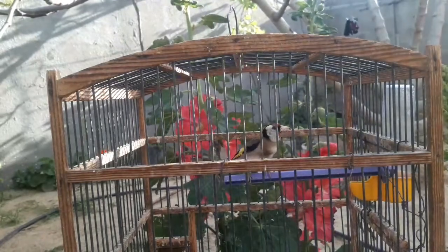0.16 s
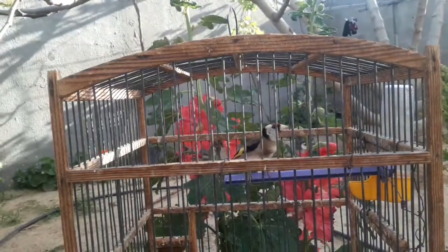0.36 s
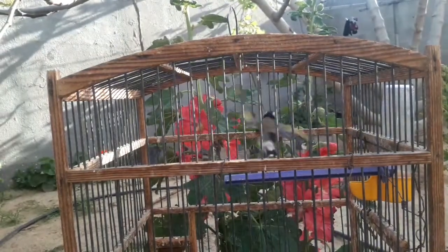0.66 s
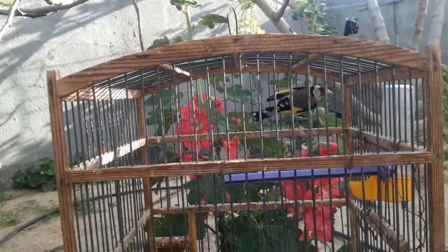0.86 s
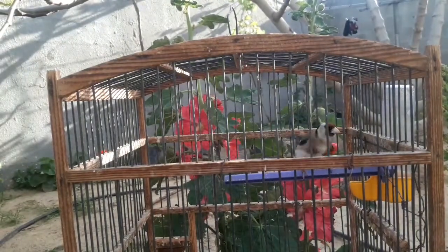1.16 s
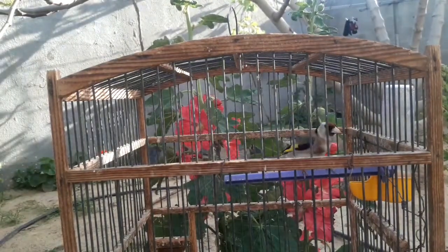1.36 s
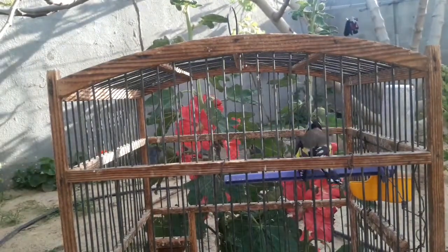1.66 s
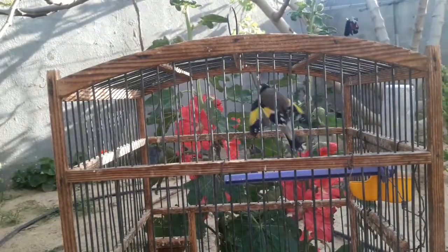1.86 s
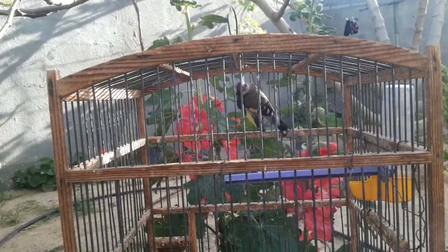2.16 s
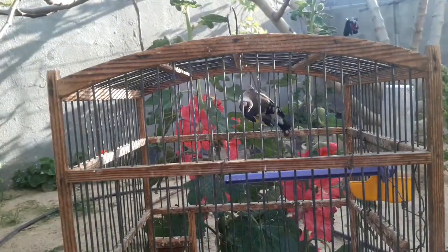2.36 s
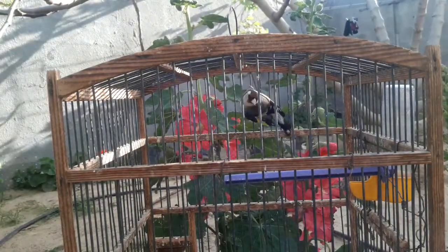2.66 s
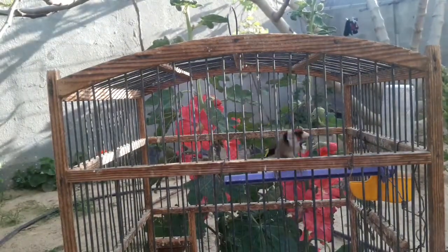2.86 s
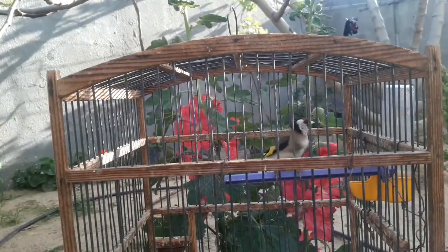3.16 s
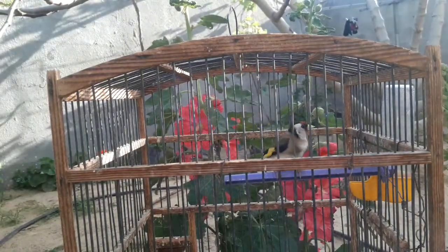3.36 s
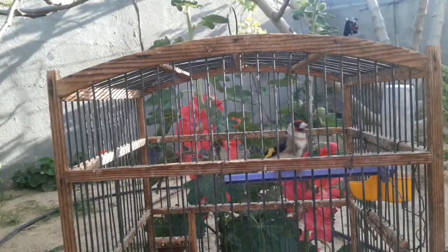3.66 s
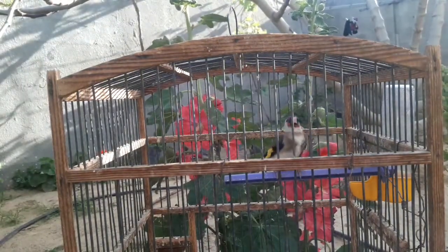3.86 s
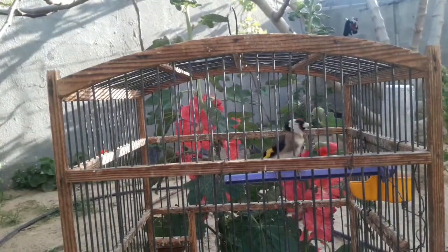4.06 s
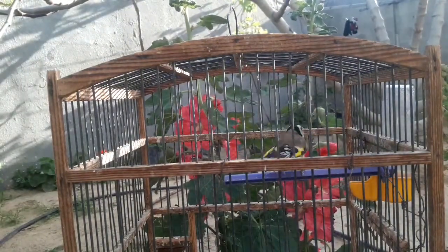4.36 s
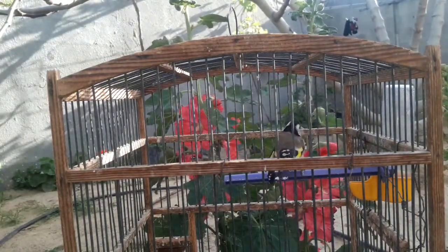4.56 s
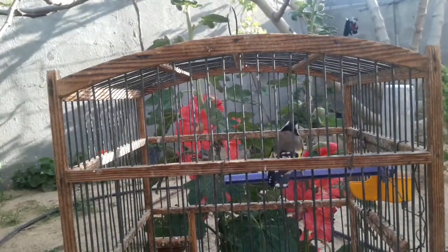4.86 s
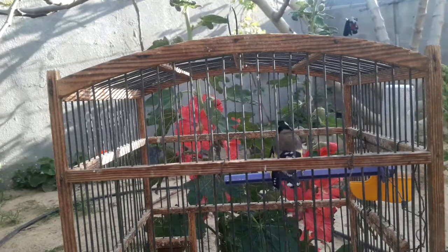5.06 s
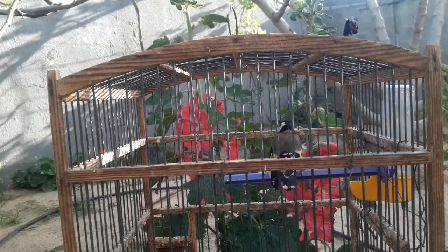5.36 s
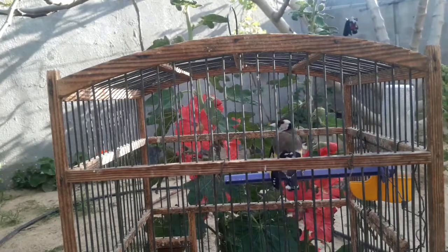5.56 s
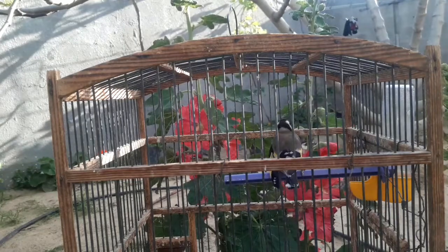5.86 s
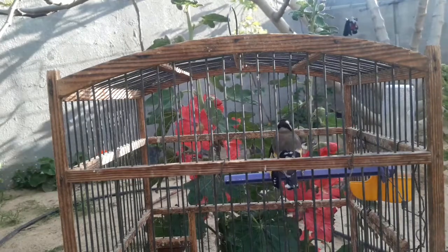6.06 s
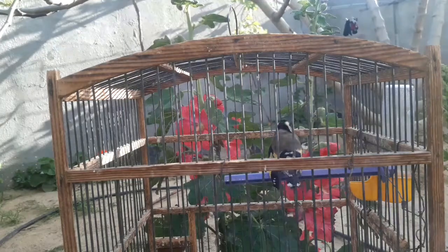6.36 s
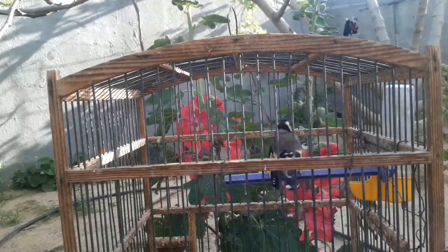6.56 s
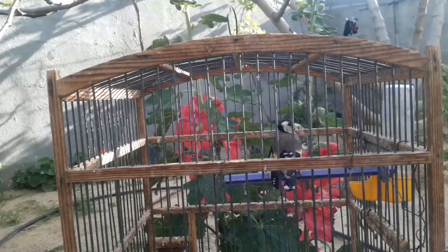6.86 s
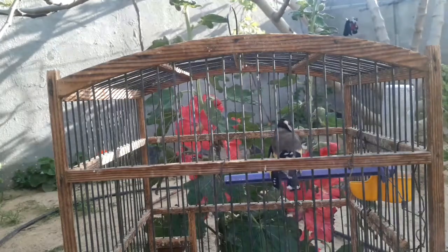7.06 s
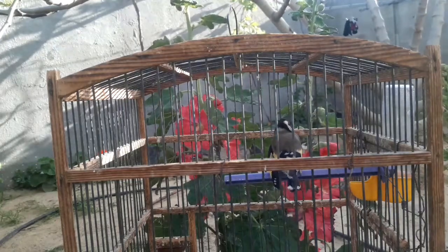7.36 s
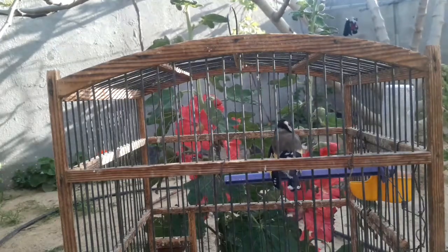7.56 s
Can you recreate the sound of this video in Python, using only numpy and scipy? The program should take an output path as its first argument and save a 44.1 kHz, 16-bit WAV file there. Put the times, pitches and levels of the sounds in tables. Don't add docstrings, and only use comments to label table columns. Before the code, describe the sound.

A goldfinch close by twitters bursts of quick, pure high notes between pauses filled with distant birdsong, sparrow chirps and soft cage knocks outdoors.

```python
import sys
import numpy as np
from scipy import signal
from scipy.fft import rfft, irfft
from scipy.io import wavfile
from scipy.ndimage import uniform_filter1d

SR = 44100
rng = np.random.default_rng(int(sys.argv[2]) if len(sys.argv) > 2 else 0)


def output_pcm(signal):
    pcm = np.clip(np.atleast_2d(signal).T, -1, 1) * 32767
    wavfile.write(sys.argv[1], SR, np.round(pcm).astype(np.int16))


def invert_db(level):
    return 10 ** (np.asarray(level, dtype=float) / 20)


N = 340011

# frequency in Hz, level in dB per Hz.
TOWN_COLOUR = [(59, -38), (110, -4), (400, -11), (1840, -20.5), (4050, -20), (6480, -24.5), (8420, -51),
               (14300, -120)]
# peak in seconds, half length in seconds, level in dB.
SHAKES = [(0, 0.014, -65.5), (.48, 0.036, -66.5), (1.62, 0.28, -61), (2.11, 0.069, -58.5),
          (2.51, 0.9, -80.5), (4.04, 0.033, -56), (4.16, 0.24, -57.5), (4.31, 0.051, -59.5)]
TOWN_LEVEL_DB = -61.5
SWELL_DB = -15.5

# peak in seconds, half length in seconds, level in dB.
GUSTS = [(0, 0.015, -57.5), (.15, 0.064, -66), (.48, 0.11, -59.5), (.76, 0.19, -72), (1.03, 0.18, -64.5),
         (1.27, 0.13, -69), (1.68, 0.11, -68), (1.95, 0.035, -78.5), (2.17, 0.23, -65.5),
         (2.44, 0.055, -66), (2.595, .04, -59.5), (2.84, 0.14, -63.5), (3.0, 0.088, -68), (3.44, 0.19, -67),
         (3.61, 0.036, -70.5), (4.26, 0.06, -65), (4.322, 0.035, -53), (4.47, 0.06, -66), (4.04, .05, -68),
         (4.8, 0.08, -73.5), (5.09, 0.048, -66), (5.48, 0.13, -68.5), (5.97, 0.16, -69.5), (6.18, .12, -66),
         (6.45, 0.37, -81.5), (7.12, 0.14, -82), (7, .03, -68), (7.302, .012, -66)]
# frequency in Hz, level in dB.
LEAF_COLOUR = [(300, -9), (1000, 2), (3000, 3.5), (6200, 3), (7500, -18), (10000, -12), (14800, -6.5),
               (15700, -8)]
# peak in seconds, # half length in
# seconds, level in dB.
SNAPS = [(0, .002, -48), (.23, .003, -64), (.244, .003, -65), (.462, .005, -62), (1.204, .003, -61),
         (1.314, .003, -58), (1.527, .003, -58), (1.679, .003, -60), (1.985, .003, -62), (2.21, .003, -61),
         (2.457, .004, -60), (2.585, .006, -58), (2.927, .004, -59), (3.722, .003, -55), (4.304, .004, -52),
         (4.441, .004, -60), (4.552, .004, -59), (4.826, .004, -63), (3.735, .025, -61), (7.152, .01, -65),
         (7.185, .01, -65), (7.614, .016, -56), (7.64, .016, -61)]
# frequency in Hz, level in dB.
TWIG_COLOUR = [(2500, -22), (4500, -3), (6200, 3), (7500, -15), (10000, -10), (14800, -6), (15700, -8)]

# peak in seconds, half length in seconds, level in dB.
WIND_PUFFS = [(.07, 0.11, -52), (2.1, 0.063, -55), (4.02, 0.16, -54.5), (4.3, 0.18, -58.5),
              (4.74, 0.1, -49), (6.76, 0.27, -52.5), (7.54, .1, -55)]
# frequency in Hz, level in dB per Hz.
WIND_COLOUR = [(20, -32), (33, -10.5), (53, 4), (76, 8.5), (147, 0.5), (377, -17.5), (500, -11.5),
               (700, -38.5)]
CALM_DB = -60
# start in seconds, peak in dB.
THUDS = [(0.048, -34.5), (0.288, -41.5), (0.581, -41), (1.671, -42.5), (1.945, -40), (2.12, -37),
         (5.081, -41), (6.503, -41.5), (6.738, -40), (7.083, -40), (7.532, -36.5)]
THUD_HZ, THUD_S = 105, .032

# start in seconds, level in dB,
# delay of the middle notes in seconds, delay of the last notes in seconds.
RISING_AT = [(4.155, 0.6, 0.0022, 0.00059), (4.432, 0.8, 0.00086, 0.00024), (4.709, 0.7, 0.00085, 0),
             (4.9848, 0.6, 0.0023, 0)]
SHORTER_AT = [(-.1312, 0.12, 0.044, 0.0011), (0.069, -0.071, 0, -0.00031),
              (5.2134, -0.037, 0.0031, -0.0082), (5.3984, 0.12, 0, -0.00057), (5.5974, 0.1, 0, 0.00022),
              (5.797, 0.027, 0, -0.00045), (5.996, 0.021, 0, 0.00075), (6.195, 0.061, 0.00064, 0.00078),
              (6.396, 0.047, 0, -0.00041)]
MIDDLE_S, LAST_S = .02, .1
# time from the phrase start in seconds, pitch in Hz, level in dB.
RISING_NOTES = [
    [(-.006, 3400, -55), (-.0015, 3500, -22), (.006, 3800, -13.5), (.0085, 3850, -20), (.015, 3800, -21),
     (.024, 3780, -40)],
    [(.0285, 4580, -50), (.036, 4685, -10.5), (.04, 4710, -10), (.0505, 4665, -4), (.0553, 4690, -7.5),
     (.059, 4760, -30), (.0617, 4720, -16), (.0655, 4660, -22), (.082, 4645, -36)],
    [(.092, 5805, -60), (.098, 5875, -30.5), (.108, 5840, -19), (.1115, 5720, -24), (.1154, 5775, -16.5),
     (.1239, 5695, -47)],
    [(.1435, 3500, -46), (.1462, 3900, -18), (.1478, 4050, -36), (.15, 4150, -15), (.158, 4170, -8.7),
     (.1674, 4245, -11), (.1724, 4365, -18), (.1769, 4450, -53)],
]
SHORTER_NOTES = [
    [(.036, 4500, -40), (.043, 4500, -24), (.0495, 4650, -19), (.0548, 4530, -5), (.0634, 4400, -2.5),
     (.0729, 4355, -3.5), (.0779, 4395, -3.8), (.0829, 4355, -18), (.0899, 4380, -32)],
    [(.1185, 5250, -50), (.121, 5230, -20), (.1242, 5310, -7.5), (.127, 5460, -13.5), (.135, 5320, -6.8),
     (.1429, 5330, -11.5), (.1464, 5285, -12), (.1524, 5285, -30), (.1559, 5300, -47)],
]
# peak from the phrase start in seconds,
# length in seconds, pitch in Hz, glide in Hz, level in dB.
RISING_PIPS = [
    (-.0295, 0.011, 2775, 367, -30.5),
    (-.009, 0.0049, 2755, 148.4, -34),
    (0.013, .013, 4190, 450, -24.5),
]
SHORTER_PIPS = [(.003, .0095, 2960, 300, -16.5), (.012, .026, 2960, 0, -31), (.0405, .006, 3900, 300, -31),
                (.0362, .009, 3530, 500, -24), (.0385, .01, 5080, 300, -24), (.046, .017, 5900, 200, -34),
                (.0325, .007, 4900, 600, -35), (.038, .007, 4450, 400, -19), (.044, .009, 5150, -200, -33),
                (.124, .011, 6160, 300, -25.5), (.133, .016, 6350, 20, -38), (.1424, .016, 6280, -200, -23)]
PIP_PEAK_SHARE, PIP_EDGE_DB = .38, -27
# note in Hz, level in dB.
OCTAVE = [(4200, -63), (4400, -65), (4560, -53), (4700, -46), (5300, -46)]
TWELFTH_DB = -58
# frequency in Hz, level in dB.
YARD_COLOUR = [(2900, 4), (3800, 2.5), (4200, 0.5), (4400, 1.5), (4700, 4.5), (5300, -3), (5800, 12.5),
               (6300, -3)]

# frequency in Hz, level in dB.
FAR_COLOUR = [(2300, -7), (3500, 3.5), (4500, 8), (5550, 1), (5850, -10), (7300, -7)]
FAR_T60_S, FAR_DIRECT_DB = 0.57, -10
# start in seconds, length in seconds, first Hz, last Hz, level in dB.
HELD = [(0, 0.051, 3400, 3240, -46.5), (2.258, .04, 4780, 4520, -43), (2.875, .22, 6200, 6120, -50.5),
        (1.852, .03, 5550, 5150, -39), (2.058, .03, 5600, 5200, -40), (1.378, .03, 7200, 6800, -53),
        (1.575, .05, 7250, 7150, -54), (2.015, .04, 7250, 7100, -53), (1.72, .05, 2520, 2430, -48),
        (1.94, .05, 2620, 2500, -46), (2.15, .06, 2520, 2430, -46), (2.615, .15, 3550, 3400, -56),
        (2.355, .07, 3250, 2700, -46.5), (2.666, 0.099, 5090, 4414, -47.5),
        (2.758, 0.17, 4820, 4100, -50.5), (2.655, 0.23, 4000, 3600, -54.5),
        (3.354, 0.31, 5600, 5360, -49.5), (3.58, 0.19, 5480, 5284, -45), (3.581, 0.15, 3460, 3310, -51.5),
        (3.81, .08, 5200, 5130, -43), (3.822, 0.045, 4500, 4000, -44.5), (3.93, .08, 5320, 5270, -43),
        (4.04, .08, 5250, 5130, -43), (4.155, .08, 5300, 5220, -44), (3.97, .17, 3430, 3380, -48.5),
        (4.19, .08, 3500, 3300, -47)]
# start in seconds, length in seconds, first Hz, last Hz, level in dB.
RISES = [(0.198, 0.054, 2800, 3320, -40.5), (2.256, 0.065, 4630, 5600, -44),
         (2.229, 0.026, 3220, 4060, -42), (2.298, 0.089, 5505, 7000, -51), (2.376, 0.063, 3200, 3890, -48),
         (2.44, 0.047, 4340, 5170, -41), (2.488, 0.08, 5080, 7220, -43), (2.61, 0.055, 3250, 5150, -45),
         (2.777, 0.022, 5100, 7400, -49), (2.957, 0.029, 2870, 4630, -40.5),
         (3.577, 0.012, 3840, 5000, -51), (3.738, 0.075, 2990, 3860, -46), (3.79, 0.04, 3800, 5200, -45),
         (4.02, .03, 4400, 5000, -43), (6.911, 0.03, 5290, 6030, -55), (7.389, 0.016, 4300, 5890, -49)]
# start in seconds, length in seconds, top in Hz, level in dB.
FALLS = [(0.379, 0.067, 3995, -46.5), (0.711, .066, 3710, -41), (1.341, 0.064, 4030, -42),
         (1.424, .12, 5230, -39.5), (1.621, .13, 5644, -39), (3.868, 0.07, 3674, -42.5),
         (4.746, 0.08, 3796, -43), (5.551, .06, 4170, -42), (5.902, .1, 4910, -42),
         (6.61, 0.074, 5116, -45.5), (6.651, 0.043, 3617, -44), (7.314, 0.09, 5020, -45),
         (7.295, .02, 6500, -52), (7.388, 0.077, 3267, -42)]
# start in seconds, top in Hz, level in dB.
RASPS = [
    (1.373, 7430, -51),
    (1.578, 7560, -53),
    (1.801, 7430, -37.5),
    (2.018, 7330, -38.5),
]
RASP_S, LOW_HZ = 0.17, 2426
FALL_BEND, RASP_BEND, RISE_BEND, CHIRP_BEND = .58, 0.64, 0.57, 0.46
# length in seconds, first Hz, last Hz, level in dB.
LOW_STROKE = (.045, 3750, 4500, -45)
HIGH_STROKE = (0.04, 5100, 6200, -39.5)
SEESAW_S, SEESAW_GAP_S, HIGH_LATE_S, SINK_HZ_PER_S = 3.07, .11, .05, 1300
# time in seconds, level in dB.
TRILL_LEVEL = [(0.5, -50), (0.68, -43), (1.188, -44.5), (1.401, -44.5)]
# delay in seconds, length in seconds,
# first Hz, middle Hz, last Hz, level in dB.
TRILL_STROKES = [
    (0, .03, 6100, 4520, 3950, 0),
    (.026, .028, 4950, 4280, 3880, -2),
]
TRILL_PER_S, TRILL_SINK_HZ_PER_S = 14.1, 290
# time in seconds, level in dB.
CHORUS_LEVEL = [(0, -88.5), (.4, -51), (1.3, -56.5), (2.6, -50.5), (4.1, -54), (5.1, -47), (6.3, -63),
                (6.85, -87.5), (7.71, -100)]
CHORUS_PER_S, CHORUS_LOW_HZ, CHORUS_HIGH_HZ, CHORUS_GLIDE_HZ = 30, 3200, 5300, 1400

# start in seconds, length in seconds, first Hz, last Hz, level in dB.
SPARROW = [(3.578, .012, 3950, 4800, -43), (.59, .08, 3430, 2700, -65), (1.356, 0.021, 3290, 2730, -45.5),
           (4.771, 0.024, 3900, 2735, -43), (4.813, 0.029, 3680, 2903, -43),
           (4.847, 0.032, 3614, 2855, -47.5), (7.325, .015, 5000, 4100, -54), (0.235, .33, 3216, 3393, -48),
           (0.19, 0.064, 2400, 3220, -50), (.362, 0.026, 4000, 4400, -52), (.395, .08, 3880, 2324, -47),
           (0.88, 0.02, 3800, 3110, -45.5), (0.923, 0.016, 3110, 3640, -46),
           (0.948, 0.018, 3385, 2560, -42), (1.205, 0.017, 2480, 2380, -46.5),
           (2.45, .016, 3340, 4330, -45), (2.467, .062, 4380, 2758, -41), (2.922, 0.023, 4540, 3150, -45),
           (2.93, 0.042, 2200, 3600, -51), (2.978, 0.033, 3650, 2320, -41.5),
           (3.605, 0.027, 3500, 2690, -47), (3.67, .03, 3000, 2360, -49), (5.03, .055, 2000, 2577, -58),
           (5.043, 0.045, 2628, 3970, -46), (5.06, .042, 2670, 4185, -41), (5.102, .058, 3880, 2584, -41.5),
           (5.14, .03, 3680, 2910, -49), (6.603, .014, 2420, 4900, -55.5), (6.643, .02, 2370, 3060, -56),
           (6.715, 0.0292, 3040, 2936, -42.5), (6.73, 0.027, 3010, 2290, -55),
           (6.922, 0.027, 5100, 5400, -54), (6.948, 0.021, 3105, 4660, -44.5),
           (6.975, 0.028, 3560, 2560, -46), (7.024, 0.018, 3050, 4140, -46.5),
           (7.048, 0.0177, 3320, 2360, -49), (7.41, 0.041, 4695, 6450, -52), (7.45, .035, 6500, 6700, -50),
           (7.505, .045, 6700, 5800, -52), (7.452, 0.07, 3657, 2600, -41.5)]
# start in seconds, peak in dB, ring in Hz.
KNOCKS = [(0.867, -36, 495), (0.979, -40, 453), (1.282, -37, 340), (1.527, -39, 366), (1.672, -38, 583),
          (2.102, -38, 486), (2.516, -36, 700), (2.709, -40, 610), (3.299, -42, 480), (4.009, -32.5, 367),
          (4.064, -37.5, 687), (4.372, -43, 1530), (5.822, -48, 1630), (6.647, -55, 500),
          (7.012, -44.5, 1250)]
# frequency in Hz, level in dB.
MOTOR_COLOUR = [(120, -11.5), (155, 1.5), (190, -18)]
# time in seconds, level in dB.
MOTOR_LEVEL = [(4.6, -73), (5.199, -59.5), (7.7, -66)]
# time in seconds, pitch in Hz, level in dB.
DOVE = [
    [(6.5, 560, -72), (6.58, 570, -61), (6.67, 575, -61), (6.7, 570, -75)],
    [(6.61, 495, -68), (6.65, 490, -56), (6.76, 488, -51), (6.8, 480, -62), (6.99, 480, -66)],
    [(7.09, 485, -66), (7.115, 482, -57), (7.16, 480, -70), (7.23, 475, -54), (7.33, 470, -55),
     (7.36, 455, -72)],
    [(6.4, 970, -68), (6.52, 1020, -69), (6.62, 1025, -63), (6.75, 1040, -67), (6.87, 1030, -70)],
    [(7.15, 1030, -72), (7.18, 1025, -62), (7.22, 1015, -66), (7.27, 1010, -72)],
]


def read(points, at):
    x, value = np.transpose(points)
    return np.interp(np.log(at + 1), np.log(x + 1), value)


def evened(x):
    return x / np.sqrt(np.mean(x ** 2) + 1e-20)


def add(mix, s, sound):
    at = round(s * SR)
    sound = sound[max(-at, 0):]
    part = mix[max(at, 0):][:len(sound)]
    part += sound[:len(part)]


def level(curve):
    s, db = np.transpose(curve)
    return invert_db(np.interp(np.arange(N) / SR, s, db))


def swells(rows):
    t = np.arange(N) / SR
    return sum(invert_db(db + SWELL_DB * np.minimum(abs(t - s) / half_s, 4) ** 1.1) for s, half_s, db in rows)


def noise(colour, size, patchy_db, flicker_db):
    frames, hz = 4 * N // size + 5, np.fft.rfftfreq(size, 1 / SR)
    real, imag, patches = rng.standard_normal((frames, len(hz), 3)).T
    patches = uniform_filter1d(patches, size=10, axis=0)
    patches = evened(uniform_filter1d(patches, size=8, axis=1))
    flicker = evened(uniform_filter1d(rng.standard_normal(frames), size=3))
    outside = (hz < colour[0][0]) | (hz > colour[-1][0])
    band_db = (read(colour, hz) - 60 * outside)[:, None]
    z = (real + 1j * imag) * invert_db(band_db + patchy_db * patches + flicker_db * flicker)
    return evened(signal.istft(z, nperseg=size, noverlap=3 * size // 4)[1][:N])


def echoes(x, t60_s, start_s, rise_s):
    t = np.arange(SR // 2) / SR
    taps = rng.standard_normal(len(t)) * (rng.random(len(t)) < .15)
    taps *= invert_db(-60 * t / t60_s) * np.clip((t - start_s) / rise_s, 0, 1)
    return signal.fftconvolve(x, taps / np.linalg.norm(taps))


def whistle(s, hz, db):
    t = np.arange(s[0], s[-1], 1 / SR)
    turns = np.cumsum(np.interp(t, s, hz)) / SR + rng.random()
    swing = np.interp(t, s, invert_db(.7 * np.asarray(db))) ** (1 / .7)
    swing = uniform_filter1d(swing, size=31)
    fade = np.clip(np.minimum(t - s[0], s[-1] - t) / .001, 0, 1) ** 2
    return swing * fade * np.sin(2 * np.pi * turns)


def glide(length_s, first_hz, middle_hz, last_hz, db, burr=0.):
    u = np.linspace(0, 1, max(round(length_s * SR), 50))
    hz = first_hz * (1 - u) * (1 - 2 * u) + 4 * middle_hz * u * (1 - u) + last_hz * u * (2 * u - 1)
    shake = evened(uniform_filter1d(rng.standard_normal(len(u) + 400), size=70))[:len(u)]
    hz = hz + burr * shake * np.clip(np.ptp(hz), 500, 3000)
    gain = invert_db(db + read(FAR_COLOUR, hz)) * signal.windows.tukey(len(u), .35)
    return np.sqrt(2) * gain * np.sin(2 * np.pi * (np.cumsum(hz) / SR + rng.random()))


def bent(length_s, first_hz, last_hz, db, bend, burr=0.):
    return glide(length_s, first_hz, first_hz + bend * (last_hz - first_hz), last_hz, db, burr)


def town():
    gain = swells(SHAKES) + invert_db(TOWN_LEVEL_DB)
    return gain * invert_db(4.5) * noise(TOWN_COLOUR, size=1024, patchy_db=2.0, flicker_db=1.5)


def leaves():
    gain = swells(GUSTS) + invert_db(-79.0)
    return gain * invert_db(12.0) * noise(LEAF_COLOUR, size=256, patchy_db=-1.5, flicker_db=2.2)


def twigs():
    return swells(SNAPS) * invert_db(11.0) * noise(TWIG_COLOUR, size=256, patchy_db=1.5, flicker_db=1.5)


def wind():
    gain = swells(WIND_PUFFS) + invert_db(CALM_DB)
    return gain * noise(WIND_COLOUR, size=1024, patchy_db=0.5, flicker_db=5.0)


def pip(s, length_s, hz, glide_hz, db):
    share = np.array([-PIP_PEAK_SHARE, 0, 1 - PIP_PEAK_SHARE])
    return np.transpose([s + share * length_s, hz + share * glide_hz, db + PIP_EDGE_DB * (share != 0)])


def finch_note(s, hz, db):
    sound = whistle(s, hz, db)
    sound = sound + whistle(s, 2 * hz, db + read(OCTAVE, hz))
    return sound + whistle(s, 3 * hz, db + TWELFTH_DB - 40 * (hz > 5000))


def yard(x):
    t = np.arange(SR) / SR
    taps = rng.standard_normal(SR) * (rng.random(SR) < .05) * np.clip((t - .006) / .008, 0, 1)
    taps *= invert_db(-40.0 - 60 * t / 0.17) + invert_db(-43.5 - 60 * t / 0.38)
    wall_gain = invert_db(read(YARD_COLOUR, np.arange(SR // 2 + 1)))
    taps = irfft(rfft(taps) * wall_gain, SR) * (t < .8)
    return signal.fftconvolve(x, taps)[SR:N + SR]


def finch():
    out = np.zeros(N + SR)
    phrases = ((RISING_NOTES, RISING_PIPS, RISING_AT), (SHORTER_NOTES, SHORTER_PIPS, SHORTER_AT))
    for notes, pips, rows in phrases:
        for note in notes + [pip(*row) for row in pips]:
            s, hz, db = np.transpose(note)
            sound = finch_note(s, hz, db)
            for start_s, gain_db, middle_late_s, last_late_s in rows:
                late_s = 0
                if s[0] > MIDDLE_S:
                    late_s = last_late_s if s[0] > LAST_S else middle_late_s
                add(out, 1 + start_s + s[0] + late_s, invert_db(gain_db) * sound)
    return out[SR:] + yard(out)


def seesaw():
    calls = []
    for beat in range(5):
        since_s = beat * SEESAW_GAP_S
        sink_hz = SINK_HZ_PER_S * since_s
        length_s, first_hz, last_hz, db = LOW_STROKE
        bend = .8 if beat == 4 else RISE_BEND
        sound = bent(length_s, first_hz - sink_hz, last_hz - sink_hz, db, bend, burr=0.1)
        calls.append((SEESAW_S + since_s, sound))
        if beat < 3:
            length_s, first_hz, last_hz, db = HIGH_STROKE
            sound = bent(length_s, first_hz - sink_hz, last_hz - sink_hz, db, .8, burr=0.1)
            calls.append((SEESAW_S + since_s + HIGH_LATE_S, sound))
    return calls


def far_calls():
    calls = [(s, bent(*note, 0.73, burr=0.17)) for s, *note in HELD]
    calls += [(s, bent(*note, RISE_BEND, burr=0.071)) for s, *note in RISES]
    calls += [(s, bent(length_s, hz, LOW_HZ, db, FALL_BEND, burr=0.069)) for s, length_s, hz, db in FALLS]
    calls += [(s, bent(RASP_S, hz, LOW_HZ, db, RASP_BEND, burr=0.041)) for s, hz, db in RASPS]
    return calls + seesaw()


def trill():
    s, db = np.transpose(TRILL_LEVEL)
    calls = []
    for at in np.arange(s[0] + .008, s[-1] - .03, 1 / TRILL_PER_S):
        beat_db = np.interp(at + .04, s, db)
        for late_s, length_s, *hz, step_db in TRILL_STROKES:
            sunk_hz = np.subtract(hz, TRILL_SINK_HZ_PER_S * (at - s[0]))
            calls.append((at + late_s, glide(length_s, *sunk_hz, beat_db + step_db, burr=.08)))
    return calls


def far_birds():
    out = np.zeros(N)
    for s, sound in far_calls() + trill():
        add(out, s, invert_db(FAR_DIRECT_DB) * sound)
        add(out, s, echoes(sound, FAR_T60_S, .001, .006))
    return out


def chorus():
    out = np.zeros(N)
    for at, pitch, slope, size in rng.random((round(CHORUS_PER_S * N / SR), 4)):
        hz = CHORUS_LOW_HZ + pitch * (CHORUS_HIGH_HZ - CHORUS_LOW_HZ)
        half_hz = CHORUS_GLIDE_HZ * (slope - .5)
        stroke = glide(.02 + .05 * size, hz + half_hz, hz, hz - half_hz, -8 * size, burr=.03)
        add(out, at * N / SR, stroke)
    blurred = echoes(out, .5, .001, .006)[:N]
    return level(CHORUS_LEVEL) * evened(blurred + invert_db(FAR_DIRECT_DB) * out)


def thuds():
    out, t = np.zeros(N), np.arange(0, THUD_S, 1 / SR)
    bump = np.sin(np.pi * (t / THUD_S) ** 1.5) ** 2
    for s, db in THUDS:
        tune, turn = rng.random(2)
        hz = THUD_HZ * (0.64 + .5 * tune)
        add(out, s, invert_db(db) * bump * np.sin(2 * np.pi * (hz * t + turn)))
    return out


def sparrow():
    out = np.zeros(N)
    for s, *note in SPARROW:
        add(out, s, bent(*note, CHIRP_BEND, burr=.045))
    return invert_db(-2.2) * out + invert_db(-4) * echoes(out, .25, .003, .008)[:N]


def knocks():
    out, t = np.zeros(N), np.arange(2000) / SR
    for s, db, hz in KNOCKS:
        ring = np.sin(2 * np.pi * hz * t)
        ring += 0.77 * np.sin(2 * np.pi * 1.5 * hz * t)
        ring += np.sin(2 * np.pi * .45 * hz * t)
        add(out, s, invert_db(db - 60 * t / 0.031) * ring * np.minimum(t / 0.0031, 1))
    return out


def motor():
    return level(MOTOR_LEVEL) * noise(MOTOR_COLOUR, size=4096, patchy_db=4.0, flicker_db=2.0)


def dove():
    out = np.zeros(N)
    for rows in DOVE:
        s, hz, db = np.transpose(rows)
        add(out, s[0], whistle(s, hz, db))
    waver = evened(uniform_filter1d(rng.standard_normal(N), size=900))
    out = out * (1 + .45 * waver)
    return invert_db(1.5) * out + invert_db(-5) * echoes(out, .15, .003, .01)[:N]


def scene():
    air = town() + leaves() + twigs() + wind() + thuds() + motor()
    birds = finch() + far_birds() + chorus() + sparrow() + dove()
    return (air + birds + knocks())[None]


def low_pass(x):
    return signal.sosfilt(signal.butter(12, 15600, fs=SR, output="sos"), x)


def record(dry):
    mix = dry - .0006
    return low_pass(mix)


dry = scene()
out = record(dry)
output_pcm(out)
```